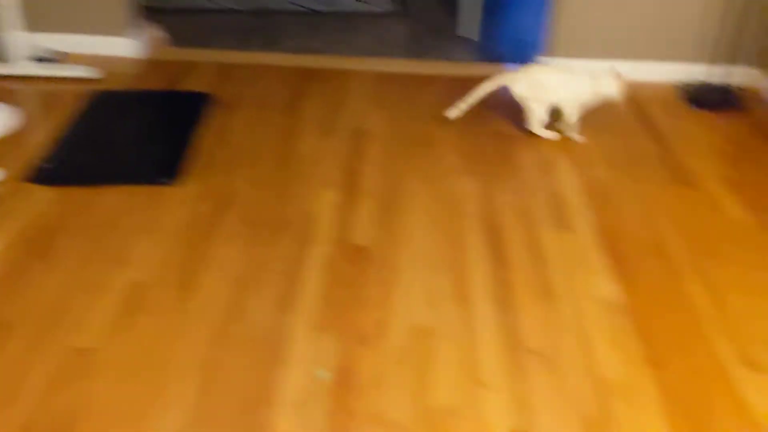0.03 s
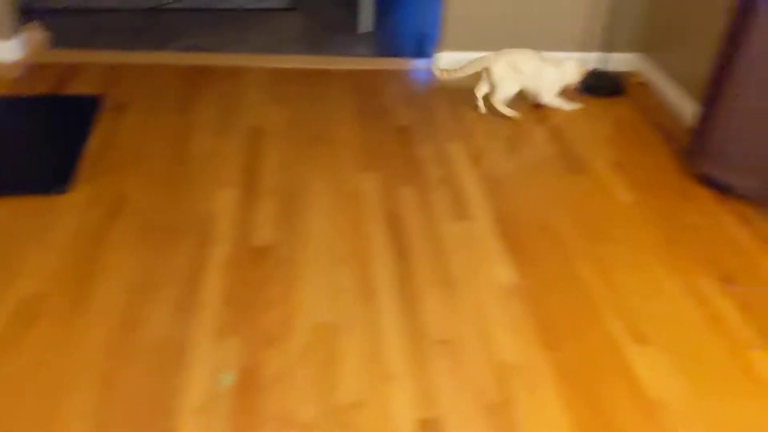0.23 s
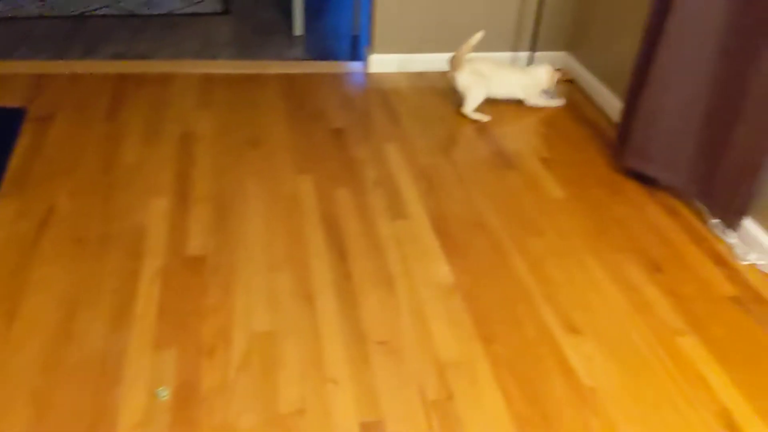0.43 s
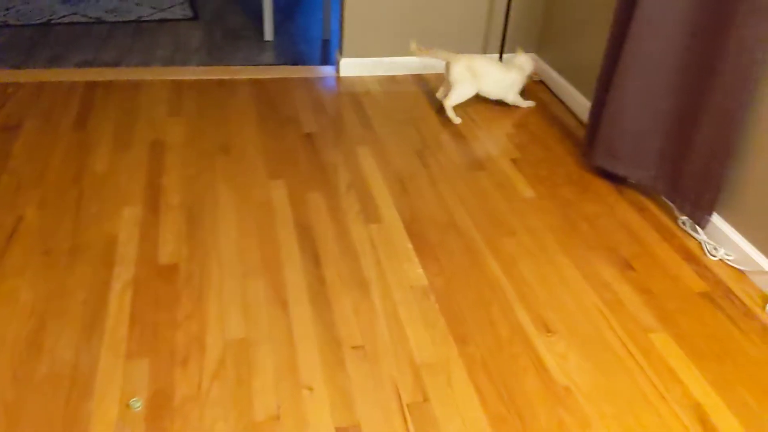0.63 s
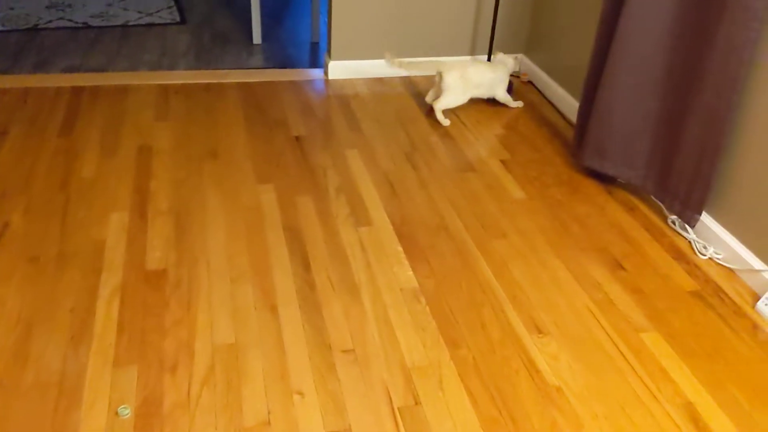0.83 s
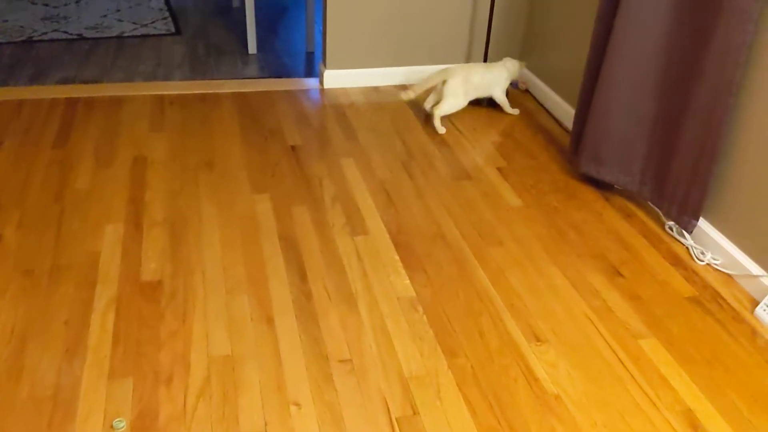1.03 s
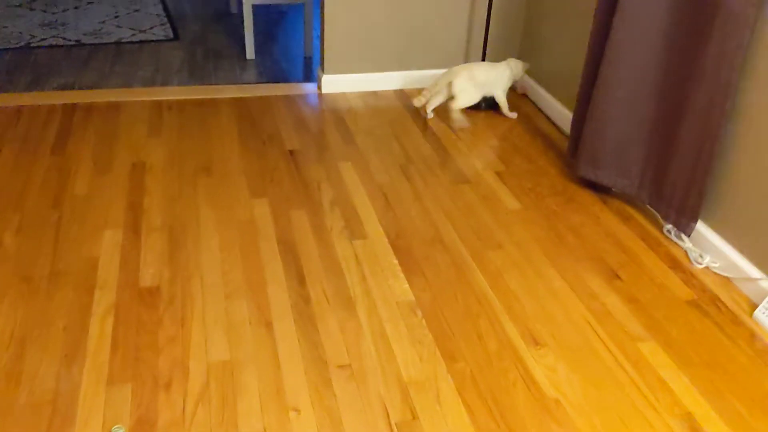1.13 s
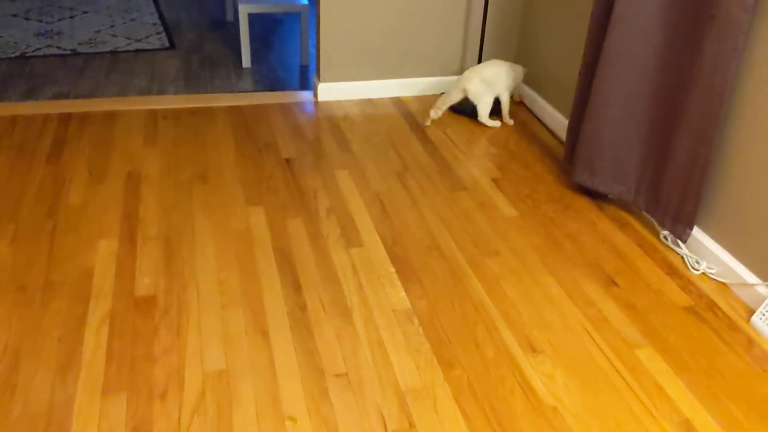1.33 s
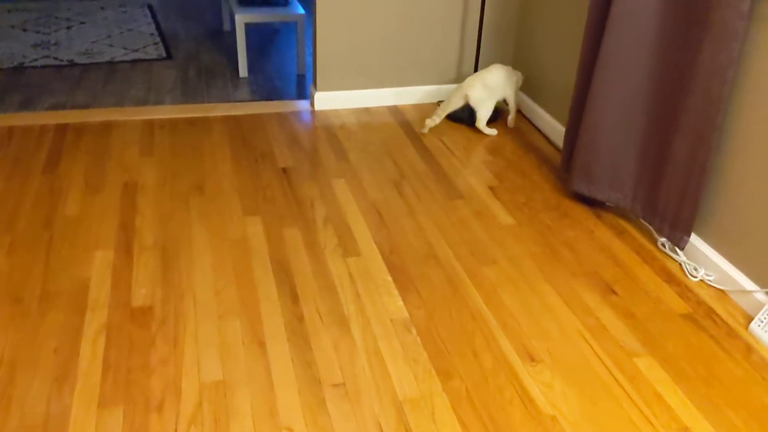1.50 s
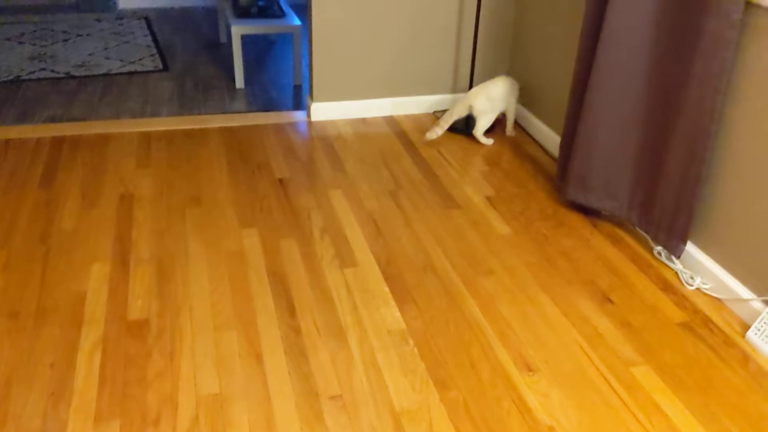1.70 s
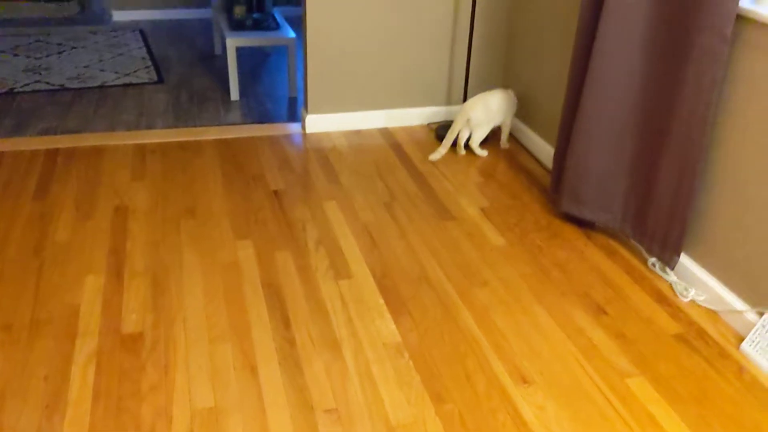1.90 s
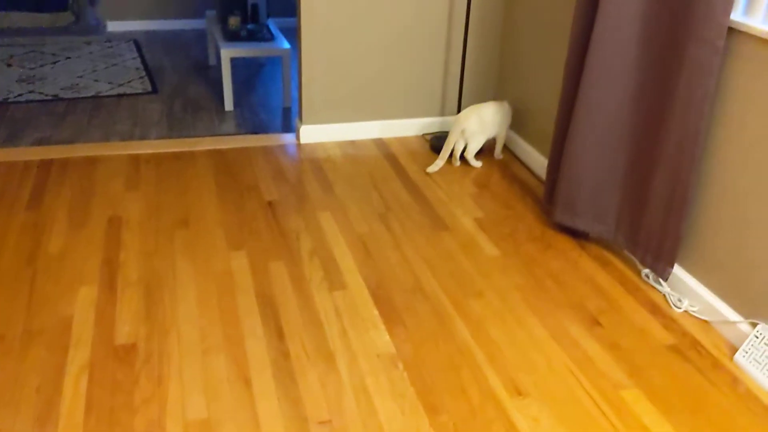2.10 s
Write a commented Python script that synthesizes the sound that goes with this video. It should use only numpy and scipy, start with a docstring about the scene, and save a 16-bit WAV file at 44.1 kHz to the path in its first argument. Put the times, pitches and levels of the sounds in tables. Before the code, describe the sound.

Cat paws scrabbling in short bursts on wood, with a sliding toy and light knocks.

```python
"""A cat chases a small toy over a bare wooden floor, heard in stereo from a few metres away. First the toy
slides and claws scrabble in short bursts, over a low rumble and the brush of fur. At 0.6 seconds the paws land
hardest: the boards thump and the skirting knocks. More scrabbling follows, then a run of knocks in the corner
from 1.1 to 1.5 seconds. A faint soft rub comes at about 2 seconds. The quiet, hard room smears every burst into
a short tail."""
import sys
import numpy as np
from scipy import signal
from scipy.fft import rfft, irfft
from scipy.io import wavfile

SR = 44100
rng = np.random.default_rng(int(sys.argv[2]) if len(sys.argv) > 2 else 0)


def generate_wav(sig):
    """Save sig (samples, or channels by samples) to the path in sys.argv[1] as 16-bit PCM at SR."""
    pcm = np.round(np.clip(np.atleast_2d(sig).T, -1, 1) * 32767).astype(np.int16)
    wavfile.write(sys.argv[1], SR, pcm)


N = 94815

# The tone of each noise. Each row: frequency in Hz, relative level in dB.
AIR_COLOUR = [(18, -31.5), (30, -3), (96, -1), (156, -8), (197, -23), (500, -19), (650, -49),
              (1100, -120)][:-3] + [(600, -19.5), (950, -24), (2100, -26.5), (4500, -30), (7500, -37),
              (10500, -33.5), (16000, -38.5)]
RUMBLE_COLOUR = [(15, -30), (28, 4.5), (38, 5.5), (70, 2), (110, -19), (200, -14), (300, -68)]
BRUSH_COLOUR = [(59, -33.5), (100, 1.5), (145, -3.5), (231, -3), (505, -14.5), (700, -18), (910, -39.5),
                (1540, -120)]
SLIDE_COLOUR = [(180, -32), (300, -9.5), (667, -9.5), (725, -4.5), (1690, -9), (3830, -2), (6520, -5.5),
                (10600, -11.5), (16000, -24)]
# How the rumble and the brushing swell and fade. Each row: time in seconds, level in dB.
RUMBLE_LEVELS = [(0, -60.5), (.08, -59), (.14, -54), (.3, -67), (.45, -51.5), (.55, -67), (1.1, -84),
                 (2.15, -82)]
BRUSH_LEVELS = [(0, -58), (.08, -62.5), (.25, -66.5), (.35, -57.5), (.45, -64.5), (.56, -75), (.72, -76),
                (.91, -73), (1.08, -86), (1.14, -60.5), (1.38, -76), (1.6, -80), (1.95, -81), (2.05, -78.5),
                (2.15, -77)]
# The sliding. Each row: time in seconds, level below the treble in dB, treble level in dB.
SLIDE_LEVELS = [(0, -47.5, -54.5), (.1, -58.5, -55), (.2, -56.5, -57.5), (.3, -54.5, -48),
                (.454, -60, -60.5), (.56, -66.5, -68), (.672, -49.5, -60.5), (.808, -57, -65),
                (1.0, -63, -50.5), (1.088, -48.5, -45), (1.17, -55, -63), (1.225, -55, -61),
                (1.344, -64.5, -77), (1.514, -78, -82), (1.699, -82, -94)]
# The notes of the wood. Each row: pitch in Hz, level in dB, seconds to fade by 60 dB.
BOARD_NOTES = [(64.9, -19, .3), (113.2, -6, 0.47), (159.4, -11.5, 0.17)]
SKIRTING_NOTES = [(255, 5, 0.11), (452, -19, 0.055), (584, -18, 0.24)]
# Knocks on the skirting. Each row: start in seconds, strength in dB.
KNOCKS = [(.607, -40.5), (.66, -47.5), (1.124, -43), (1.17, -51), (1.215, -55), (1.26, -54), (1.3, -54.5),
          (1.34, -48.5), (1.41, -59.5), (1.44, -56.5), (1.49, -59), (1.53, -64)]
# Paws landing, and in the last two rows a soft rub near 2 seconds. Each row: start in seconds, thump strength
# in dB, slap strength in dB.
PAW_STEPS = [(0.232, -71, -52), (0.308, -42.5, -58), (0.356, -45, -49.5), (.603, -32, -48),
             (.615, -26.5, -42.5), (0.921, -41.5, -53), (1.128, -52, -55), (1.439, -56.5, -59),
             (1.478, -48.5, -78), (1.999, -70, -73.5), (2.052, -67, -72.5)]
# How claws and toy ring on varnished wood. Each row: pitch in Hz, width in Hz.
CLAW_RINGS = [(1150, 304), (1550, 493), (1900, 395), (2400, 480), (3200, 600), (4300, 436), (6300, 960),
              (8800, 1500), (10800, 3340), (14200, 3500)]
# Scrabbling. Each row: start in seconds, seconds until it fades, then a level in dB for each ring.
CLAW_BURSTS = [ (0.2083, 0.0092, -47, -55, -45.5, -44.5, -40, -50, -27, -51, -26.5, -40),
               (.232, 0.0046, -49.5, -65, -51, -47, -47.5, -58, -50, -61, -55, -58),
               (0.35, 0.0073, -79, -44, -55, -49, -73, -52, -66, -73, -64, -59),
               (0.358, 0.0041, -50, -84, -58, -53, -47.5, -50, -42, -41.5, -49, -55),
               (.593, 0.0092, -38.5, -42, -55.5, -40, -47, -43, -68, -58, -49, -65),
               (0.606, 0.0048, -43, -52, -41.5, -49, -41, -36.5, -37.5, -38, -39.5, -41),
               (.619, 0.016, -45, -46, -53, -38, -42, -33, -74, -42.5, -42.5, -60.5),
               (0.8973, 0.0062, -45.5, -37.5, -38, -41, -38.5, -66, -39, -68, -39.5, -52),
               (.909, 0.013, -48.5, -60, -45, -46, -46, -68, -39.5, -43.5, -45, -75),
               (0.937, 0.023, -48, -55, -57, -45, -41.5, -58, -48.5, -59, -48, -54),
               (1.044, 0.0095, -58.5, -57, -46, -48, -49, -53.5, -39, -63, -46, -73),
               (1.056, 0.011, -70, -56, -58, -60, -47, -48, -67, -71, -48.5, -75),
               (1.084, 0.032, -50.5, -50, -56, -48, -48.5, -57, -56, -62, -54, -60),
               (1.126, 0.0075, -67, -44, -77, -81, -49, -52.5, -60, -67, -52.5, -61),
               (1.136, 0.0018, -81, -53, -72, -44, -49, -49, -63, -57, -45.5, -61),
               (1.44, .020, -82, -66.5, -82, -70.5, -72, -77, -70.5, -70.5, -73, -78),
               (1.469, 0.022, -66, -72, -77, -71, -71, -71, -81, -85, -74, -80)]
# The room's echo. Each row: frequency in Hz, seconds to fade by 60 dB.
ECHO_TIMES = [(100, 0.35), (700, 0.71), (1800, 0.57), (3500, 0.29), (6000, 0.36), (9000, 0.28),
              (14000, 0.36)]
# How alike left and right sound. Each row: frequency in Hz, likeness (1 means the same).
LIKENESS = [(60, 0.89), (240, 0.87), (950, 0.22), (3770, -0.03), (15000, -0.03)]
# The microphone's lean to one side. Each row: frequency in Hz, left minus right in dB.
BALANCE = [(60, -1), (150, 2.5), (380, 1.5), (950, 2.5), (2380, 4.5), (5980, 3.5), (15000, -5)]
# Where the microphone hears less. Each row: frequency in Hz, width in Hz, change in dB.
MIC_DIPS = [(5260, 360, -1), (7840, 1140, -5.5)]

CLICKS_PER_S, CLICK_SPREAD_DB = 9000, 2.25
BURST_RISE_S, BURST_FADE_S, CLAW_LOW_CUT_HZ = .0015, .0037, 800
PUSH_S, SLAP_FADE_S = .0023, .02
ECHO_DB, ECHO_GAP_S, ECHO_BLEND_S = .5, .001528, .12
AIR_DB, TREBLE_HZ, LEFT_DELAY_S, TOP_HZ = -73, 5230, .000075, 16200
TIME, FREQS = np.arange(N) / SR, np.fft.rfftfreq(N, 1 / SR)


def amp(db):
    return 10 ** (np.asarray(db) / 20)


def unit_level(x):
    return x / np.sqrt(np.mean(x ** 2) + 1e-20)


def look_up(points, hz):
    freqs, values = np.transpose(points)
    return np.interp(np.log(hz + 1), np.log(freqs + 1), values)


def loudness(points):
    times, db = np.transpose(points)
    return amp(np.interp(TIME, times, db))


def ring(x, hz, width):
    """Three filter passes keep only the sound near one pitch."""
    b, a = signal.iirpeak(hz, hz / (2 * width), SR)
    for _ in range(3):
        x = signal.lfilter(b, a, x)
    return x


def noise(colour, above_hz):
    """Stereo noise, scaled so that its part above the given frequency has level 1."""
    left, other = rfft(rng.standard_normal((2, N)))
    alike = np.clip(look_up(LIKENESS, FREQS), 0, 1)
    right = alike * left + np.sqrt(1 - alike ** 2) * other
    spectra = np.array([left, right]) * amp(look_up(colour, FREQS))
    return irfft(spectra, N) / np.std(irfft(spectra[0] * (FREQS > above_hz), N))


def clicks():
    """A hard edge dragged over wood makes many tiny catches of uneven size."""
    sizes = amp(CLICK_SPREAD_DB * np.minimum(rng.exponential(1, N), 4))
    signs = rng.choice([-1., 1.], N)
    return unit_level(sizes * signs * (rng.random(N) < CLICKS_PER_S / SR))


def room_air():
    """The faint, steady hush of the room."""
    return amp(AIR_DB) * noise(AIR_COLOUR, above_hz=300)


def rumble():
    """Steps and the hand holding the microphone make a low rumble."""
    return loudness(RUMBLE_LEVELS) * noise(RUMBLE_COLOUR, above_hz=20)


def room_echo(x):
    """Sound bounces off the walls. Three echoes fade in and out, as if the cat were moving."""
    out, slots = np.zeros((2, N)), np.arange(0, SR - 20, 20)
    for k in range(3):
        bounces = np.zeros((2, SR))
        arrivals = slots + rng.integers(0, 20, (2, len(slots)))
        np.put_along_axis(bounces, arrivals, rng.choice([-1., 1.], arrivals.shape), 1)
        hz, t, bands = signal.stft(bounces, SR, nperseg=256)
        alike = np.clip(look_up(LIKENESS, hz), 0, 1)[:, None]
        bands[1] = alike * bands[0] + np.sqrt(1 - alike ** 2) * bands[1]
        fade = amp(-60 * t / look_up(ECHO_TIMES, hz)[:, None])
        tail = signal.istft(bands * fade, SR, nperseg=256)[1]
        tail = np.pad(tail / np.linalg.norm(tail[0]), ((0, 0), (round(ECHO_GAP_S * SR), 0)))
        share = np.sqrt(2 / 3) * np.cos(np.pi * (TIME / ECHO_BLEND_S + k / 3))
        out += signal.fftconvolve((share * x)[None], tail, axes=1)[:, :N]
    return amp(ECHO_DB) * out


def fur_brush():
    """Pads and fur rub softly on the floor."""
    return loudness(BRUSH_LEVELS) * noise(BRUSH_COLOUR, above_hz=200)


def wood_thumps(hits, notes):
    """Each soft push makes the wood ring with its own fading notes."""
    t, out = np.arange(SR // 2) / SR, np.zeros(N + SR)
    wood = sum(amp(db - 60 * t / fade_s) * np.sin(2 * np.pi * hz * t) for hz, db, fade_s in notes)
    for start, db, *_ in hits:
        out[round(start * SR):][:len(t)] += amp(db) * (1 - np.exp(-t / PUSH_S)) * wood
    return out[:N]


def paw_slaps():
    """The pads give a dull slap each time a paw lands."""
    shape = np.zeros(N)
    for start, _, db in PAW_STEPS:
        age = np.maximum(TIME - start, 0)
        shape += amp(db) * np.minimum(age / PUSH_S, 1) * np.exp(-age / SLAP_FADE_S)
    return shape * unit_level(ring(clicks(), hz=609, width=740))


def toy_slide():
    """Fine grit rasps under the sliding toy and paws; its treble comes and goes on its own."""
    spectrum = rfft(clicks()) * amp(look_up(SLIDE_COLOUR, FREQS)) * (FREQS > 300)
    grit = rfft(unit_level(irfft(spectrum, N)))
    treble_share = 1 / (1 + (TREBLE_HZ / (FREQS + 1)) ** 8)
    times, body_db, treble_db = np.transpose(SLIDE_LEVELS)
    body = irfft(grit * (1 - treble_share), N) * loudness(np.c_[times, body_db])
    treble = irfft(grit * treble_share, N) * loudness(np.c_[times, treble_db])
    return body + treble


def claw_scrabble():
    """Claws and toy catch on the wood in short bursts, each with its own mix of rings."""
    catches, out, shapes = clicks(), np.zeros(N), []
    for start, length, *_ in CLAW_BURSTS:
        rise = np.clip((TIME - start) / BURST_RISE_S, 0, 1)
        fade = np.exp(-np.maximum(TIME - start - length, 0) / BURST_FADE_S)
        shapes.append(rise * fade)
    levels = amp([row[2:] for row in CLAW_BURSTS])
    for k, (hz, width) in enumerate(CLAW_RINGS):
        strength = levels[:, k] @ np.array(shapes)
        out += ring(catches * strength, hz, width) / np.std(ring(catches, hz, width))
    return signal.sosfilt(signal.butter(3, CLAW_LOW_CUT_HZ, "high", fs=SR, output="sos"), out)


def scene():
    """The chase and its echo, coloured by the microphone, over the soft background noises."""
    cat = claw_scrabble() + toy_slide() + paw_slaps()
    wood = wood_thumps(PAW_STEPS, BOARD_NOTES) + wood_thumps(KNOCKS, SKIRTING_NOTES)
    echo = room_echo(cat) + amp(-8) * room_echo(wood)
    left_delay = np.exp(-2j * np.pi * FREQS * [[LEFT_DELAY_S], [0]])
    spectra = rfft(echo + wood) + rfft(cat) * left_delay
    dips_db = sum(db * np.exp(-((FREQS - hz) / width) ** 2) for hz, width, db in MIC_DIPS)
    sides_db = look_up(BALANCE, FREQS) * [[.5], [-.5]]
    chase = irfft(spectra * amp(dips_db + sides_db), N)
    return chase + rumble() + fur_brush() + room_air()


def record(dry):
    """Cut away the very highest treble."""
    low_pass = signal.firwin(511, TOP_HZ, window=("kaiser", 9), fs=SR)
    return signal.oaconvolve(dry, low_pass[None], "same")


dry = scene()
out = record(dry)
generate_wav(out)
```